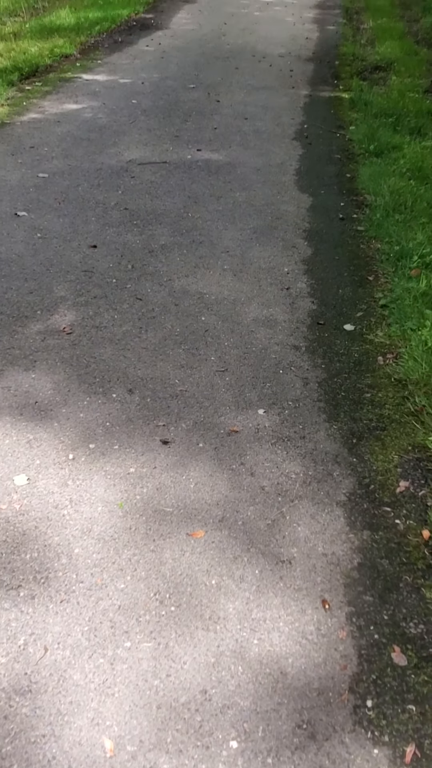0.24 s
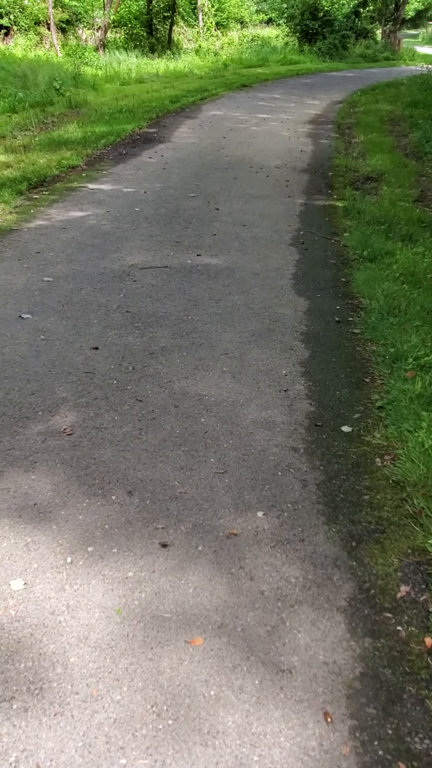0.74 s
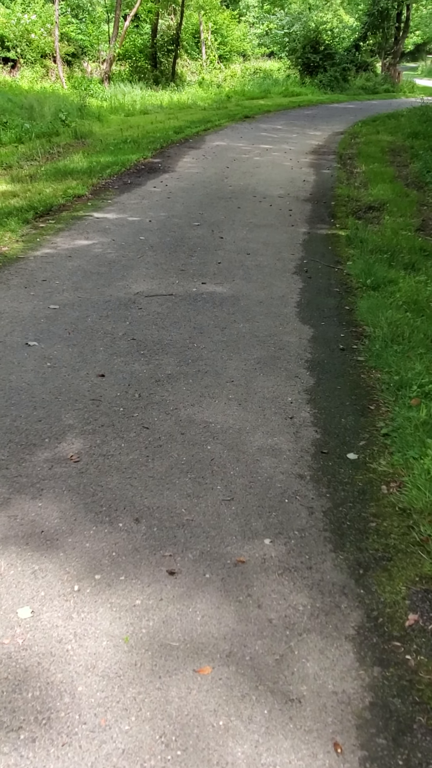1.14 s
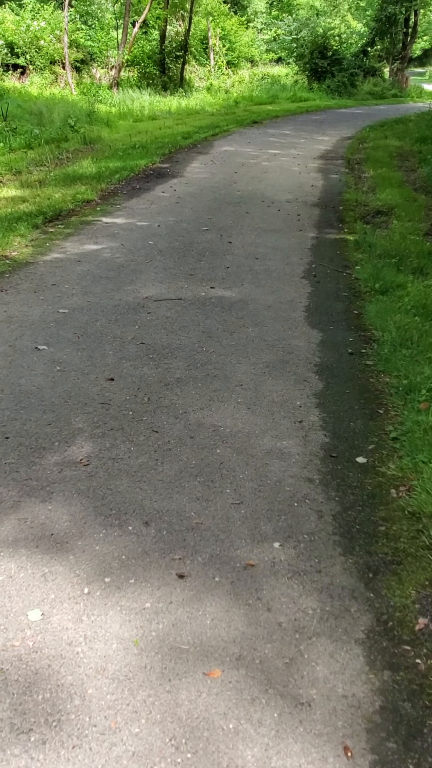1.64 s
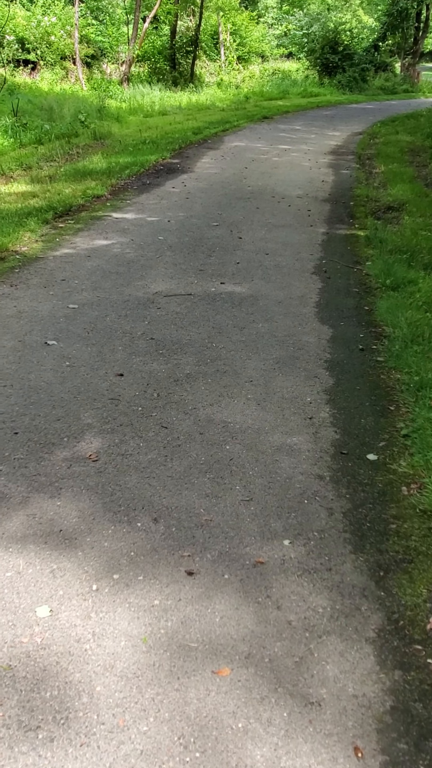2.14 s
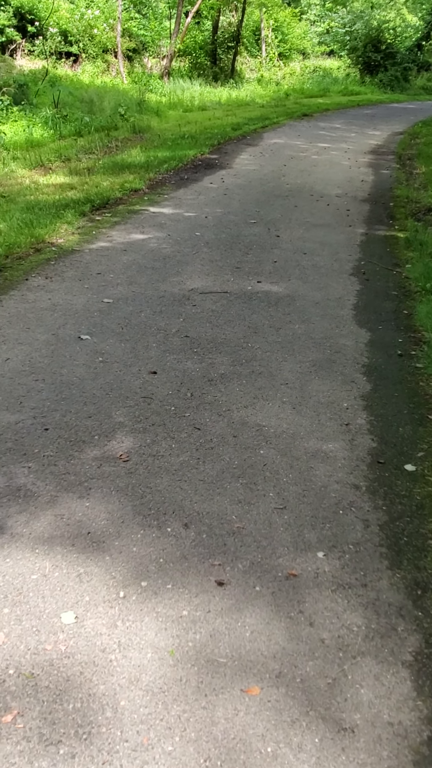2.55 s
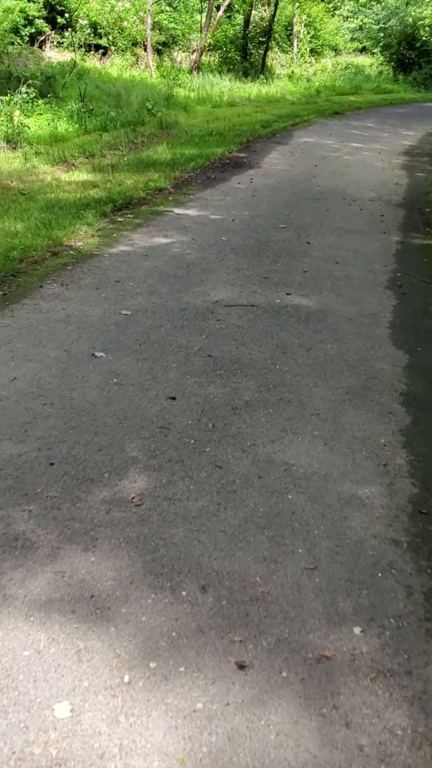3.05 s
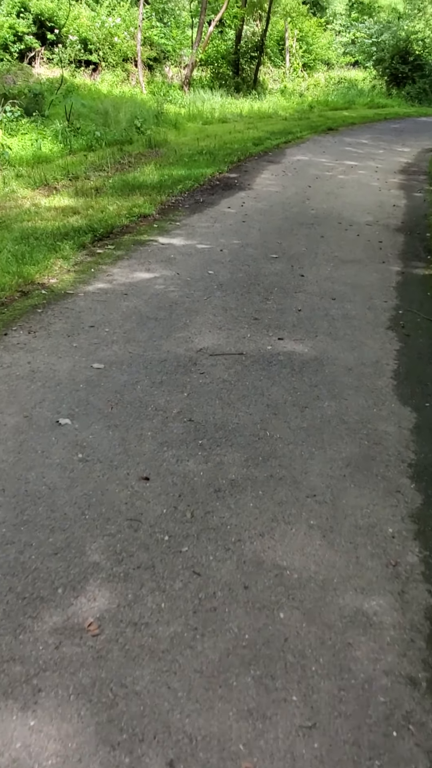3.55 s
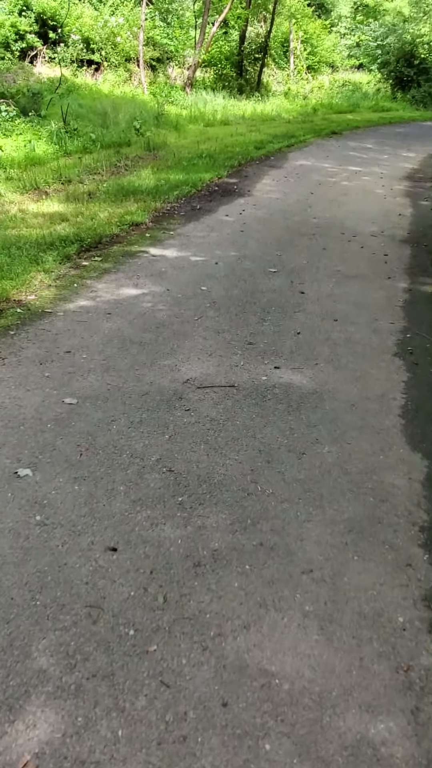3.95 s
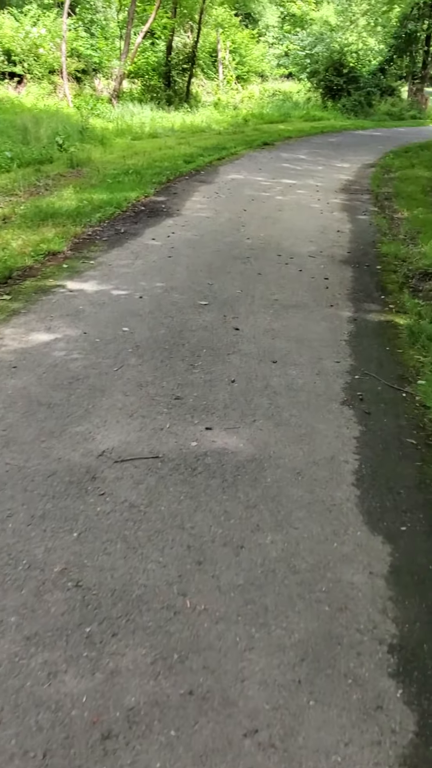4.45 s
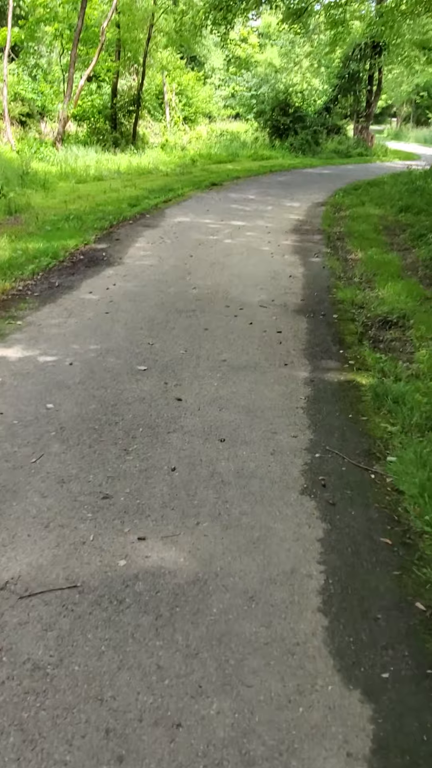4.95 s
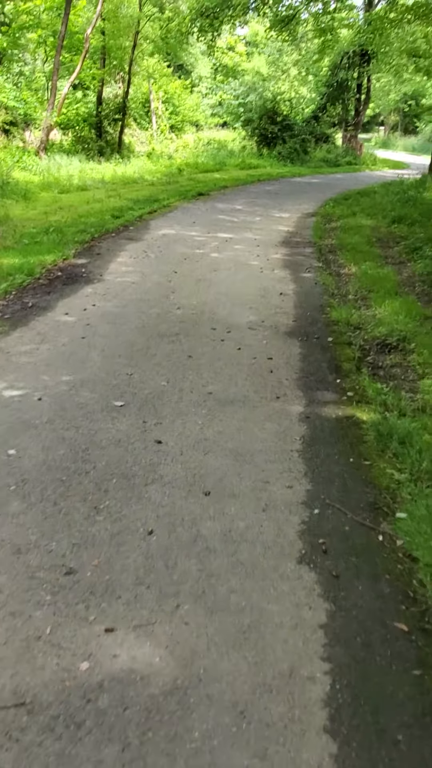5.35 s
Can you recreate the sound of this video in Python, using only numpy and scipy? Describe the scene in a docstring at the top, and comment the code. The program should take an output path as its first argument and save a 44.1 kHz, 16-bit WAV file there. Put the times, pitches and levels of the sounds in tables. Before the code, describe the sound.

Cicadas chorus without pause in woodland, a loud whistling drone under a brighter sizzling hiss, with a faint distant engine and low wind rumble.

```python
"""A woodland path, walked along while periodical cicadas chorus in the trees.
One species blends into a loud whistling drone: slurred sine notes in a crowd of coloured noise.
A second makes the brighter hiss above it: click trains ringing body resonances, merged with noise.
Underneath, a far engine at a nearly steady speed is a stack of fading sine orders, beside a low hum.
Coloured stereo noise makes the farthest canopy and a little wind rumbling on the microphone."""
import sys
import numpy as np
from scipy import signal
from scipy.fft import rfft, irfft, next_fast_len
from scipy.io import wavfile
from scipy.ndimage import uniform_filter1d

SR = 44100
rng = np.random.default_rng(int(sys.argv[2]) if len(sys.argv) > 2 else 0)


def digitize_waveform(pressure):
    """Quantize a signal to 16-bit integers and store it at the path in sys.argv[1].

    Rows of a 2-D input are taken as channels; values are limited to [-1, 1].
    """
    field = np.atleast_2d(pressure).T
    bounded = np.clip(field, -1, 1)
    quanta = np.round(bounded * 32767).astype(np.int16)
    wavfile.write(sys.argv[1], SR, quanta)


N = 247401
T = np.arange(N) / SR  # time of every sample in seconds
ENGINE_HZ = 24.43  # mean cycle rate, shared by the orders and their dead spots


def drone():
    """Nearer whistlers stand in a blended crowd; their close pitches beat into a rough flutter."""
    # The blended song: the air sac resonance with a shelf below from the falling phrase ends.
    # Each row: frequency in Hz, relative power density in dB per Hz.
    song = [(600, -47), (750, -33.5), (860, -19), (1020, -22.5), (1160, -10.5), (1240, -6.5), (1305, 1),
            (1365, -3), (1440, -10), (1560, -18.5), (1800, -29), (2400, -33), (3200, -37.5), (5000, -51.5)]
    near_db, direct_db = -7, -5  # near singers against the crowd, their direct sound against its tail
    voices = whistlers(count=14, pitch_hz=1350, spread_hz=40, waver_hz=8.02, phrase_s=2.8, slur=0.3)
    tail = woods(voices, t60=0.39)
    near = rms_one(tail + from_db(direct_db) * from_left(voices, lag_ms=0.26))
    crowd = diffuse(song) + from_db(near_db) * near
    level_db = -27 + 0.1955 * T  # grows slightly along the path
    return from_db(level_db) * evened(crowd, seconds=0.13)


def whistlers(count, pitch_hz, spread_hz, waver_hz, phrase_s, slur):
    """Each insect holds a near-pure note, slurs it down as its abdomen drops, rests and restarts."""
    starts = rng.random(count)
    paces = rng.uniform(0.72, 1.2, count)
    tunings = rng.standard_normal(count)
    chorus = 0
    for start, pace, tuning in zip(starts, paces, tunings):
        progress = (start + pace * T / phrase_s) % 1  # position within the phrase
        ending = np.interp(progress, [0.72, 0.88], [0, 1])
        effort = np.interp(progress, [0, 0.1, 0.72, 0.9], [0, 1, 1, 0])
        held_hz = pitch_hz + spread_hz * tuning + waver_hz * drift(7.94)
        note = sine(held_hz * (1 - slur * ending))
        chorus = chorus + effort * (1 - ending / 2) * note
    return chorus


def hiss():
    """Tymbal clicks ring the upper body resonance and merge with far noise from both resonances."""
    # The lower and the upper body resonance.
    # Each row: frequency in Hz, relative power density in dB per Hz.
    low_resonance = [(2500, -32), (3050, -19.5), (3250, -9), (3480, -3.5), (3850, 1.5), (4250, 0.5),
                     (4800, -1.5), (5600, -11), (7000, -37)]
    high_resonance = [(3800, -24), (4700, -7.5), (5200, 1.5), (5750, 5), (6150, 1.5), (6600, -5),
                      (7150, -16), (7900, -16.5), (8600, -17), (9400, -30), (10400, -26), (11600, -23),
                      (13300, -31.5), (16000, -40)]
    clicks = woods(tymbals(count=6, clicks_hz=377.3, jitter=0.08), t60=0.24)
    near = rms_one(filtered(clicks, from_db(at_bins(high_resonance))))
    upper = rms_one(diffuse(high_resonance) + from_db(-5.0) * near)
    upper = swell(mean_db=-31.5, swing_db=2.37, crest_s=0.96) * upper
    lower = swell(mean_db=-37, swing_db=2.4, crest_s=1.12) * diffuse(low_resonance)
    flicker = from_db(0.27 * drift(10.6))
    return flicker * (upper + lower)


def tymbals(count, clicks_hz, jitter):
    """Each insect buckles its ribs in a fast, slightly uneven train of clicks."""
    trains = 0
    for pace in rng.uniform(0.75, 1.25, count):
        cycles = np.cumsum(clicks_hz * pace * (1 + jitter * drift(30))) / SR
        clicks = np.diff(np.floor(cycles), prepend=0)  # one impulse as each cycle completes
        trains = trains + clicks * from_db(2 * drift(2.5))
    return trains


def swell(mean_db, swing_db, crest_s):
    """Gain of a chorus whose singers grow loud and soft together in one slow wave."""
    period_s = 5.85
    return from_db(mean_db + swing_db * np.cos(2 * np.pi * (T - crest_s) / period_s))


def engine(smear, fading_db, wobble):
    """Orders of one cycle, phase-smeared by the long path; echoes fade higher ones more and faster."""
    # The engine's orders, before the overall trim in the mix. Each row: multiple of the cycle rate,
    # level in dB at the start, change along the path in dB per second.
    orders = [(2, -42, 0.1), (3, -45, 1), (4, -37, -0.02), (5, -40.5, 0.15), (6, -55, .5), (7, -60.5, -0.5),
              (8, -64.5, 2.5), (9, -71, 0.5), (10, -72, 0.5), (12, -63, -0.47), (16, -54.5, -1.18),
              (19, -74, 2), (20, -68, 1.5), (24, -59.5, -0.75), (28, -64.5, -0.5), (32, -61, 0.5)]
    turn = 2 * np.pi * np.cumsum(ENGINE_HZ * (1 + wobble * drift(3.2))) / SR
    tone = 0
    for multiple, start_db, db_per_s in orders:
        order = round(multiple)
        scatter = (order / 16) ** 0.58
        fading = fading_db * scatter * drift(2.95 * scatter)
        level_db = start_db + db_per_s * T - dead_spots(order) + fading
        tone = tone + from_db(level_db) * np.sin(order * turn + smear * order ** 2)
    return np.sqrt(2) * tone  # makes the levels rms


def dead_spots(order):
    """Loss in dB where an echo cancels one order on the path; longer waves have wider dead spots."""
    # Each row: time of the crossing in seconds, order as a multiple of the cycle rate, depth in dB.
    crossings = [(.1, 4, 21), (.1, 5, 10.5), (.1, 16, 8), (.3, 12, 9), (1.0, 3, 8), (1.48, 5, 9.5),
                 (1.8, 6, 16), (1.9, 16, 17), (2.25, 4, 18), (2.27, 3, 15), (2.4, 8, 12), (3.02, 5, 28),
                 (3.05, 6, 5), (3.35, 16, 13), (3.7, 4, 7.5), (4.4, 8, 6), (4.47, 4, 24), (4.75, 16, 12)]
    half_width_wavelengths, walk_m_per_s = 0.079, 1.32
    wavelength_m = 343 / (order * ENGINE_HZ)  # speed of sound in m/s over frequency
    width_s = half_width_wavelengths * wavelength_m / walk_m_per_s
    loss_db = 0
    for crossing_s, multiple, depth_db in crossings:
        if round(multiple) == order:
            loss_db = loss_db + depth_db / (1 + ((T - crossing_s) / width_s) ** 2)
    return loss_db


def hum(pitch_hz, waver_hz):
    """A low, slightly wavering sine that swells once out of a faint rest level."""
    rest_db, swell_db, crest_s, width_s = -58, 14, 5.1, 1
    level_db = rest_db + swell_db * np.exp(-((T - crest_s) / width_s) ** 2)
    return np.sqrt(2) * from_db(level_db) * sine(pitch_hz + waver_hz * drift(1.3))


def canopy():
    """The farthest insects and leaves merge into coloured noise with a slightly unsteady level."""
    # Each row: frequency in Hz, relative power density in dB per Hz.
    far_colour = [(2000, 2), (5000, 0.5), (8000, 13), (9500, 5.5), (11800, -3.5), (13300, -10),
                  (16000, -12)]
    return from_db(-45.0 + 0.6 * drift(5.5)) * diffuse(far_colour)


def wind():
    """Wind on the microphone and far rumble: gusting low noise, as the breeze freshens a little."""
    # Each row: frequency in Hz, relative power density in dB per Hz.
    rumble_colour = [(15, -22), (30, -19), (55, 2), (100, -1.5), (135, -8), (220, -19.5), (400, -17),
                     (700, -17.5), (1200, -4), (3000, -54)]
    breeze_db = -47 + 0.82 * T
    return from_db(breeze_db + 1.4 * drift(3.1)) * diffuse(rumble_colour)


def diffuse(spectrum):
    """Countless far sources from all sides: stereo noise, most alike in the bass."""
    # Left-right likeness of the sound field. Each row: frequency in Hz, correlation from -1 to 1.
    likeness = [(100, 0.97), (270, 0.86), (450, 0.88), (740, 0.44), (1250, -0.053), (2000, -0.11),
                (3300, 0.17), (5500, -0.043), (9000, 0.0074)]
    alike = np.clip(at_bins(likeness), -1, 1)
    colour = from_db(at_bins(spectrum))
    mid = filtered(rng.standard_normal(N), colour * np.sqrt(1 + alike))
    side = filtered(rng.standard_normal(N), colour * np.sqrt(1 - alike))
    return rms_one(np.array([mid + side, mid - side]))


def woods(x, t60):
    """Trunks and leaves scatter a sound into a dying tail (t60 in s), different at each port."""
    tail_s = np.arange(SR) / SR
    tail = rng.standard_normal((2, SR)) * from_db(-60 * tail_s / t60)
    run_in = np.concatenate([x[SR:0:-1], x])  # a reversed second ahead, so the tail is already full
    return rms_one(signal.fftconvolve(run_in[None], tail, axes=1)[:, SR:SR + N])


def from_left(x, lag_ms):
    """A sound from the left reaches the right port a moment later."""
    return rms_one(np.array([x, np.interp(T - lag_ms / 1000, T, x)]))


def evened(x, seconds):
    """Divide a stereo sound by its running rms to take out the slow swells."""
    power = uniform_filter1d(x.mean(axis=0) ** 2, int(seconds * SR))
    return x / np.sqrt(power + 1e-12)


def drift(rate):
    """Slow random wander of rms 1: noise through two equal low-pass poles at `rate` Hz."""
    pole = np.exp(-200 * np.pi * rate / SR)  # runs at one value per 100 samples
    noise = rng.standard_normal(N // 100 + 2002)
    slow = signal.lfilter([1], [1, -2 * pole, pole ** 2], noise)[2000:]  # drop the settling
    return np.interp(np.arange(N) / 100, np.arange(len(slow)), rms_one(slow))


def sine(hz):
    """A sine that follows a moving frequency by summing its phase."""
    return np.sin(2 * np.pi * np.cumsum(hz) / SR)


def from_db(db):
    """Decibels to gain."""
    return 10 ** (np.asarray(db) / 20)


def rms_one(x):
    """Scale so that the mean of the channels has rms 1."""
    return x / np.sqrt(np.mean(np.atleast_2d(x).mean(axis=0) ** 2) + 1e-20)


def at_bins(points):
    """Interpolate a (Hz, value) curve over log frequency at every bin of the padded transform."""
    hz, value = np.transpose(points)
    bins = np.fft.rfftfreq(next_fast_len(N, True), 1 / SR)
    return np.interp(np.log(bins + 1), np.log(hz), value)


def filtered(x, gain):
    """Apply a frequency response given as a gain at every bin."""
    size = next_fast_len(N, True)
    return irfft(rfft(x, size) * gain, size)[..., :N]


def scene():
    """Both choruses over the engine, the hum, the canopy and the wind, coming up at first."""
    # Each row: time in seconds, gain of the whole scene in dB.
    opening = [(0, -2), (.85, 0)]
    opening_s, opening_db = np.transpose(opening)
    gain = from_db(np.interp(T, opening_s, opening_db))
    machines = from_db(-1.0) * engine(smear=0.62, fading_db=2.5, wobble=0.0015)
    machines = machines + hum(pitch_hz=59.0, waver_hz=0.78)
    return gain * (drone() + hiss() + canopy() + wind() + machines)


def record(dry):
    """Each microphone port colours its channel; the top is cut steeply."""
    # The ports differ in colour. Each row: frequency in Hz, left minus right in dB.
    port_difference = [(60, -1), (400, -1.5), (1400, -1.5), (2000, -2.5), (3000, -1.4), (6000, -1),
                       (7250, -3.5), (7900, 10), (8500, 1.5), (9500, 3), (12000, 2.2), (16000, 3)]
    cutoff_hz = 15800
    ports = from_db(at_bins(port_difference) * np.array([[0.5], [-0.5]]))  # half to each side
    top = from_db(at_bins([(cutoff_hz - 80, 0), (cutoff_hz + 150, -90)]))
    return filtered(dry, ports * top)


dry = scene()
out = record(dry)
digitize_waveform(out)
```